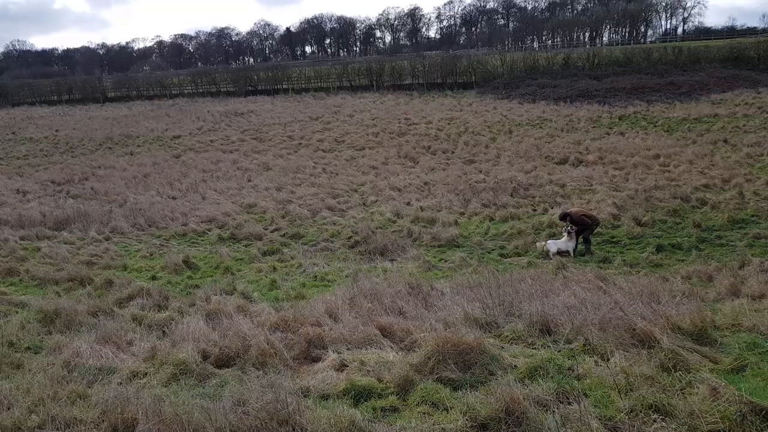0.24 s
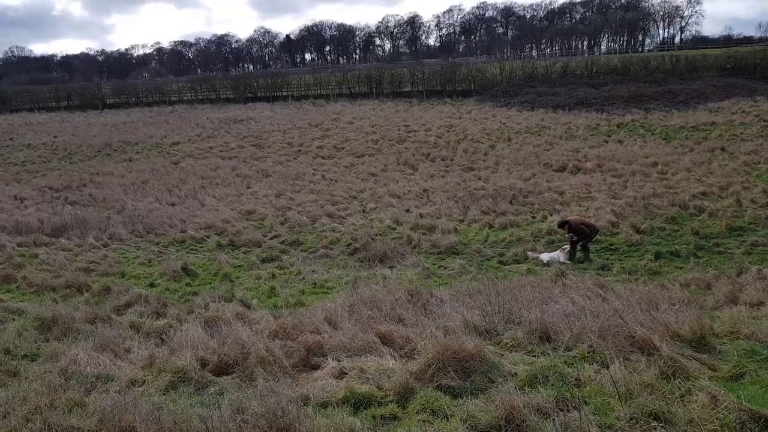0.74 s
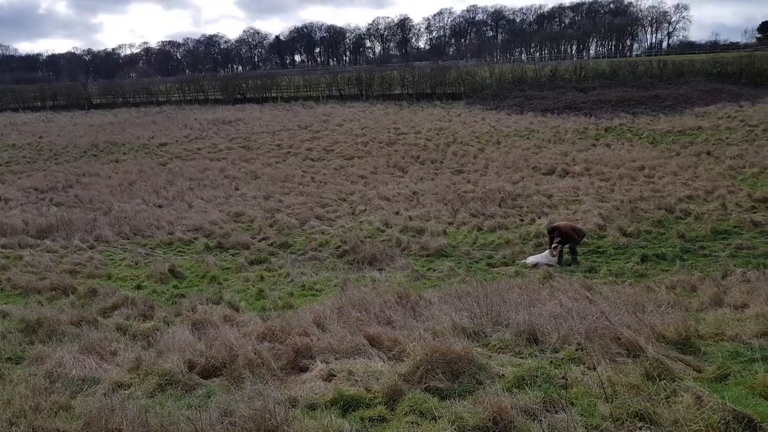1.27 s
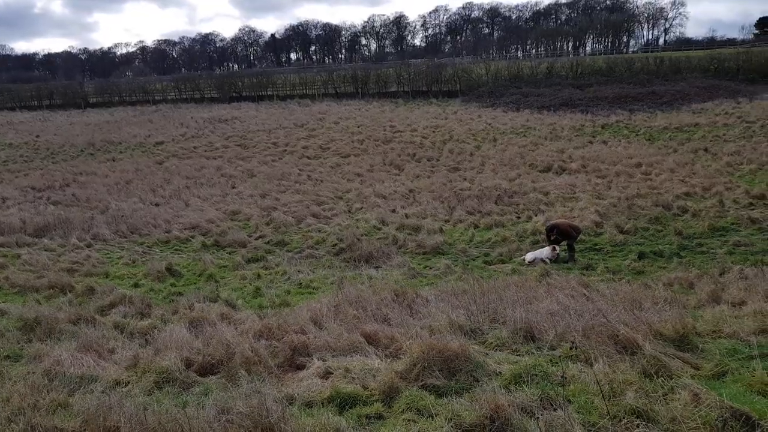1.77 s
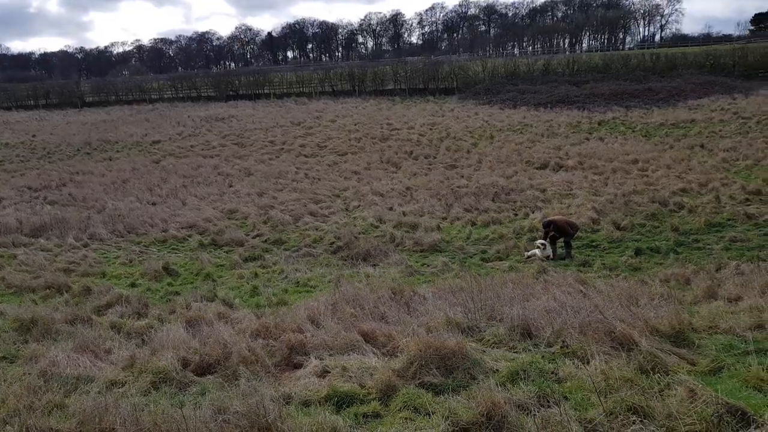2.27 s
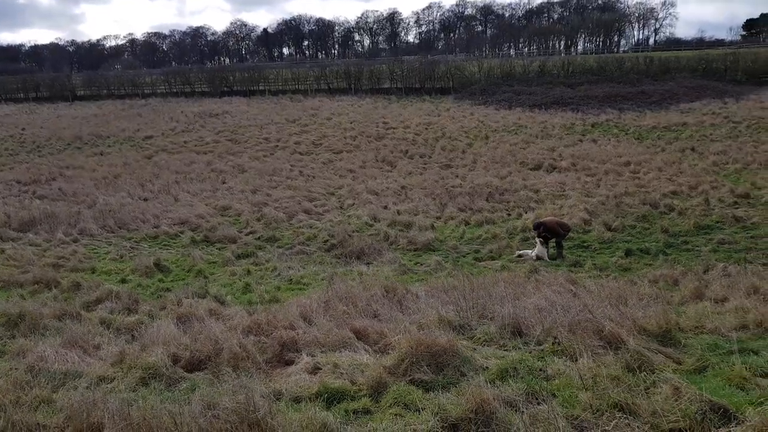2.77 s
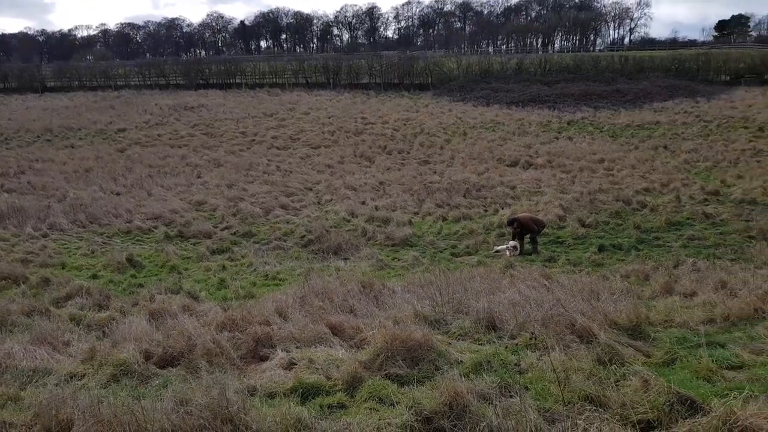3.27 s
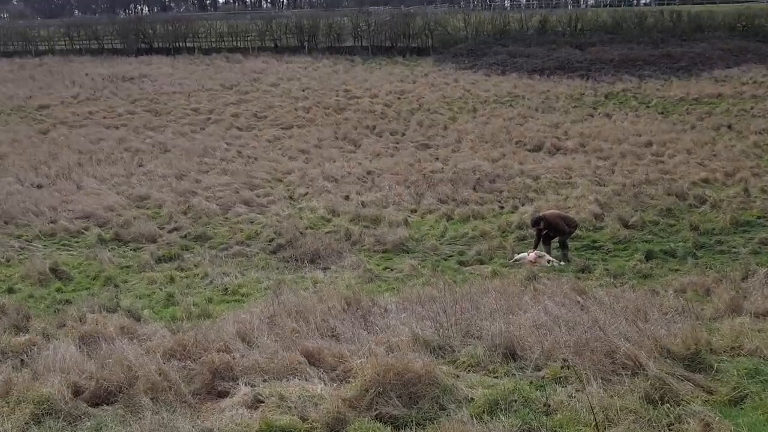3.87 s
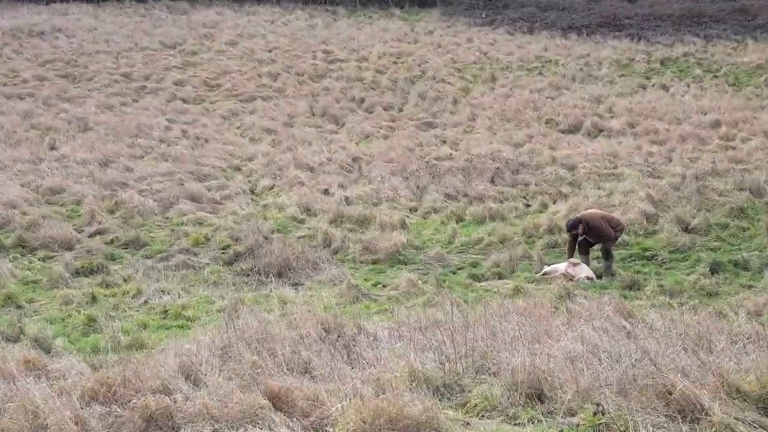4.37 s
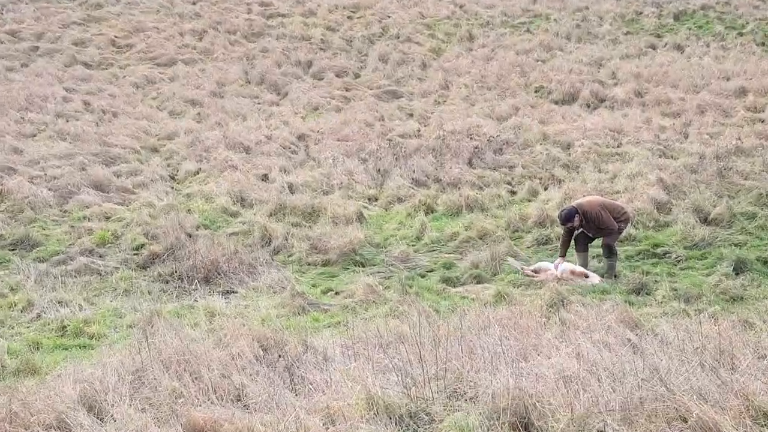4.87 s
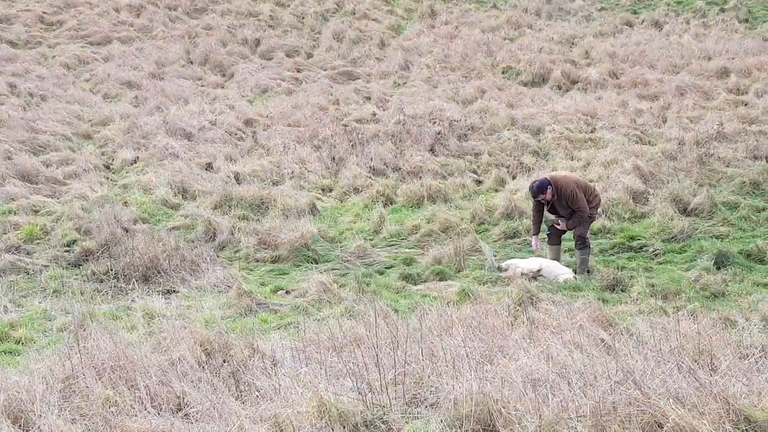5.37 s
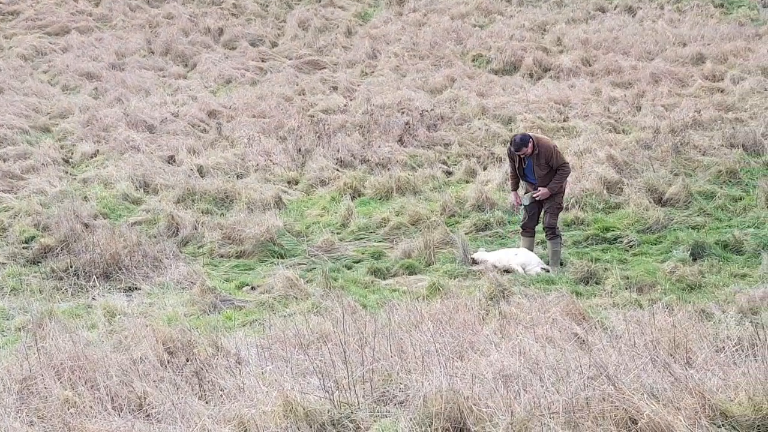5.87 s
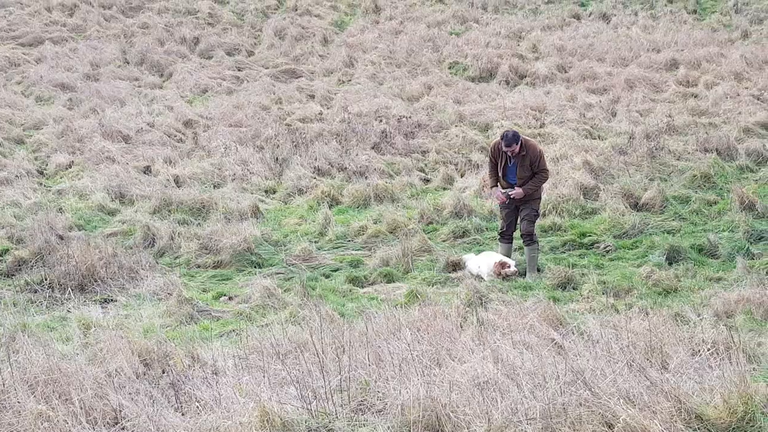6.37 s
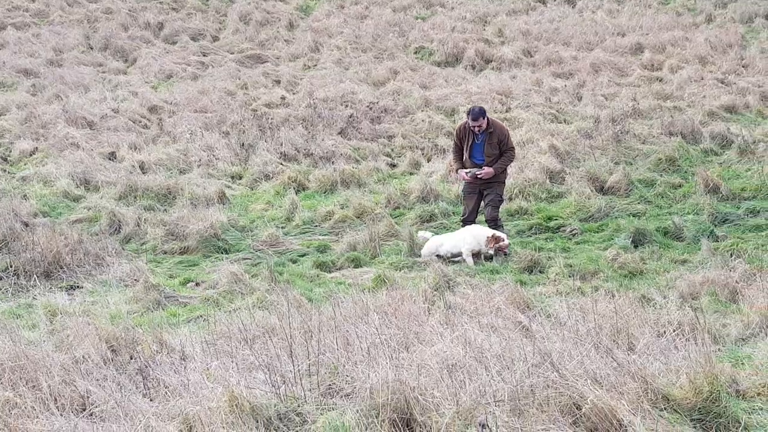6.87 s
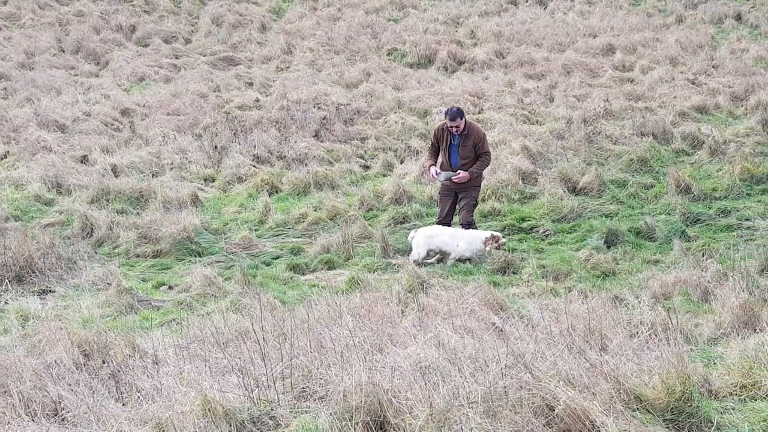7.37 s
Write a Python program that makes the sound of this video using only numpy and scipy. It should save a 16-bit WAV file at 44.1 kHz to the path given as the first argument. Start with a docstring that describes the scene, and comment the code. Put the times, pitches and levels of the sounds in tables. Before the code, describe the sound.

Close, rough wind rumble dominates a quiet grassland. It starts with a gust and a dense ragged burst, continues with frequent short bassy thumps on the right and low flutters on the left, then calms after about five seconds. Dry grass rustles faintly, a barely audible hoarse bird chirps once midway, soft brushing strokes pass, and a late strong buffet interrupts the lull.

```python
"""Wind buffets the two microphone ports of a hand-held camera in a field of long grass.
Unrelated turbulence, as filtered noise, thumps in short deep buffets at the right port and flutters
through the hollow of the left one. Far trees, near and dry grass and a high hiss are coloured noise;
the camera's noise suppression leaves a narrow shifting band. Something soft, like a sleeve, brushes
the left port in strokes of noise. A distant bird chirps once: a hoarse, gliding tone."""
import sys
import numpy as np
from scipy import signal
from scipy.fft import rfft, irfft, next_fast_len
from scipy.io import wavfile
from scipy.ndimage import uniform_filter1d, map_coordinates

SR = 44100
rng = np.random.default_rng(int(sys.argv[2]) if len(sys.argv) > 2 else 0)


def wrap_up_sound(samples):
    """Save the sound to the file named by the first command line argument, as 16-bit audio."""
    columns = np.atleast_2d(samples).T
    # keep every value between -1 and 1, then stretch to whole-number steps
    tamed = np.clip(columns, -1, 1)
    steps = np.round(tamed * 32767).astype(np.int16)
    wavfile.write(sys.argv[1], SR, steps)


N = 336483
TIME = np.arange(N) / SR
BAND_HZ = 22 * 2 ** np.arange(0, 8, 1 / 3)
TOP_HZ = 15750

# Relative levels and spectra: source gains and rms scaling follow.
# changing airflow beneath the gusts and buffets: time_s, left_relative_db, right_relative_db
AIRFLOW = [(0.1, -36.5, -30.5), (0.45, -26.5, -24), (1.2, -36, -27), (1.7, -31, -25.5), (2.75, -31, -30.5),
           (3.3, -28.5, -27), (3.8, -34, -27), (4.3, -30, -24.5), (5.0, -27.5, -26), (5.2, -29.5, -38),
           (5.8, -37, -36.5), (6.5, -47.5, -37.5), (7.0, -47, -33), (7.6, -36.5, -35.5)]
# gusts at the left port: crest_s, lift_db, half_width_s (to 1/e), cutoff_lift_octaves
GUSTS = [(0.01, 11.5, 0.077, 0.42), (0.256, 5.5, 0.16, 1.1), (0.596, 4, 0.062, 0.53),
         (0.997, 7, 0.029, 1.8), (1.1, 7, 0.055, 1.7), (1.402, 4, 0.073, 1.1), (1.886, 0.5, 0.039, 1.2),
         (2.15, 6.5, 0.078, 0.9), (2.587, 5, 0.06, -0.39), (2.795, 3.5, 0.053, 1.1),
         (4.845, 6.5, 0.047, -0.16), (4.939, 4, 0.039, 0.94), (5.526, 6, 0.031, 0.26),
         (6.05, 7, 0.14, 0.35), (6.809, 7, 0.083, -0.14), (7.127, 11, 0.073, -0.83), (7.317, 6, 0.035, 1.4)]
# brief lulls on both ports: lowest_s, change_db, half_width_s (to 1/e)
LULLS = [(0.732, -6, 0.0054), (2.212, -11, 0.019)]
# sharp flutters at the left port: onset_s, relative_db, eddy_cutoff_hz
FLUTTERS = [(0.406, -31, 800), (0.978, -33.5, 845), (1.078, -35, 1750), (1.119, -34.5, 1200),
            (1.315, -33, 800), (2.028, -33.5, 1050), (2.066, -32.5, 950), (2.133, -25.5, 884),
            (2.157, -30, 1050), (2.181, -32.5, 1040), (2.245, -35.5, 900), (2.819, -38, 900),
            (2.863, -33.5, 900), (3.099, -35, 630), (4.371, -36.5, 900), (4.45, -30.5, 920),
            (4.934, -31, 765)]
# buffets on the right port: crest_s, relative_db, half_width_s (to 1/e^2), eddy_cutoff_hz
BUFFETS = [(0.453, -14.5, 0.051, 800), (0.485, -10.5, 0.041, 1450), (0.513, -10.5, 0.025, 1200),
           (0.543, -17.5, 0.064, 780), (0.612, -21, 0.025, 602), (0.666, -16.5, 0.023, 380),
           (0.802, -13, 0.017, 270), (0.85, -18.5, 0.045, 340), (1.005, -22.5, 0.1, 487),
           (1.336, -27.5, 0.027, 646), (1.384, -22.5, 0.0088, 260), (1.585, -13.5, 0.012, 390),
           (1.694, -10, 0.015, 297), (1.772, -20, 0.035, 320), (1.88, -20.5, 0.02, 260),
           (1.971, -14, 0.02, 497), (2.07, -23.5, 0.018, 350), (2.136, -12, 0.022, 517),
           (2.281, -16, 0.027, 278), (2.428, -17.5, 0.023, 302), (2.495, -19.5, 0.028, 310),
           (2.77, -25, 0.02, 400), (2.927, -20, 0.034, 720), (2.972, -15.5, 0.035, 275),
           (3.035, -18, 0.029, 200), (3.103, -16, 0.024, 322), (3.194, -19.5, 0.067, 395),
           (3.247, -16.5, 0.021, 310), (3.305, -17, 0.038, 334), (3.417, -15, 0.018, 218),
           (3.503, -14.5, 0.028, 209), (3.69, -19, 0.042, 282), (3.742, -18, 0.047, 242),
           (3.861, -18, 0.019, 220), (4.001, -19, 0.021, 290), (4.096, -20.5, 0.0097, 600),
           (4.162, -14.5, 0.034, 330), (4.257, -18, 0.022, 180), (4.336, -20.5, 0.016, 150),
           (4.426, -9.5, 0.016, 265), (4.652, -17, 0.02, 285), (4.692, -17.5, 0.019, 280),
           (4.747, -22.5, 0.013, 197), (4.855, -16, 0.01, 300), (4.976, -15, 0.029, 312),
           (5.037, -15.5, 0.04, 240), (5.597, -23.5, 0.043, 213), (5.84, -24, 0.019, 110),
           (5.902, -18.5, 0.036, 85), (6.275, -23, 0.012, 258), (6.328, -28, 0.064, 174),
           (6.552, -27, 0.032, 137), (6.783, -26, 0.03, 376), (6.833, -18.5, 0.033, 550),
           (6.916, -21, 0.0093, 340), (7.109, -13.5, 0.014, 448), (7.135, -8.5, 0.021, 340),
           (7.161, -17, 0.023, 910), (7.182, -17.5, 0.03, 850), (7.215, -25, 0.04, 110),
           (7.453, -23.5, 0.017, 91.5)]
# far-tree spectrum at the left port: frequency_hz, relative_db
TREES_LEFT_SPECTRUM = [(200, -9), (480, -0.5), (650, -8), (900, -1.5), (1030, -0.5), (1210, -7), (1370, -2),
                       (1880, -16), (2300, -16.5), (2600, -16), (2850, -20), (5000, -45.5)]
# far-tree spectrum at the right port: frequency_hz, relative_db
TREES_RIGHT_SPECTRUM = [(200, -3.5), (450, 4.5), (650, -5), (1000, -2.5), (1800, -8.5), (2300, -19),
                        (2800, -38.5), (5000, -58)]
# breeze in the far trees: time_s, relative_db
TREES_LEVEL = [(0, -50.5), (2.9, -51), (3.7, -47), (4.2, -49), (5.6, -47), (7.6, -49.5)]
# narrow noise band left by the camera's noise suppression, its centre shifting:
# time_s, centre_hz, level_db (against the trees)
SUPPRESSOR_BAND = [(2.9, 1950, -14), (3.2, 1558, -13.5), (3.7, 1624, -9), (4.6, 1570, -11.5),
                   (5.75, 1620, -11.5), (6.0, 1940, -10)]
# near-grass spectrum: frequency_hz, relative_db
GRASS_SPECTRUM = [(1500, -10.5), (2500, 3), (3100, -3.5), (3950, -0.5), (4300, -8), (6800, -11),
                  (7800, -25), (14000, -33)]
# breeze in the near grass: time_s, relative_db
GRASS_LEVEL = [(0.05, -66), (0.45, -62.5), (0.9, -68), (1.55, -60.5), (1.85, -73), (2.3, -61.5),
               (3.22, -70), (3.4, -63), (3.85, -65.5), (4.2, -70), (4.9, -64), (5.8, -66.5), (7.05, -61.5),
               (7.6, -64)]
# high-hiss spectrum: frequency_hz, relative_db
HISS_SPECTRUM = [(3000, -11), (9300, -16.5), (10500, -1), (12000, 3.5)]
# brushing strokes: crest_s, relative_db, rise_s, fall_s (both to 1/e)
STROKES = [(2.22, -62.5, 0.083, 0.027), (2.66, -56, 0.21, 0.2), (3.0, -65.5, 0.15, 0.14),
           (6.06, -58.5, 0.13, 0.11), (6.26, -56.5, 0.12, 0.06), (6.36, -54.5, 0.095, 0.046),
           (6.57, -62.5, 0.15, 0.13)]
# brushing spectrum: frequency_hz, relative_db
BRUSH_SPECTRUM = [(1200, 4.5), (2500, 5.5), (3800, 2), (5000, -1), (7000, 1), (8200, -5), (12000, -0.5),
                  (14000, -3.5)]
# rustles of dry grass: crest_s, level_db, half_width_s (to 1/e), centre_hz
RUSTLES = [(3.713, -65.5, 0.39, 3050), (4.55, -70.5, 0.23, 3520), (5.13, -68.5, 0.4, 3380),
           (7.0, -63, 0.09, 2800)]
# bird chirp: time_s, pitch_hz
CHIRP = [(3.985, 2630), (4.01, 2830), (4.03, 2580), (4.065, 3000)]

# faster air makes smaller eddies: cut-off at a reference airflow level, and its rise with level
REFERENCE_DB = -33
LEFT_EDDY_HZ, LEFT_OCTAVES_PER_DB = 413, 0.16
RIGHT_EDDY_HZ, RIGHT_OCTAVES_PER_DB = 118, 0.0445
HISS_START_DB, HISS_END_DB, HISS_GROWTH_S = -81, -75, 5.2
STROKE_SHAPE = 1.5  # 1 = pointed crest, 2 = rounded


def undb(db):
    """Decibels to gain."""
    return 10 ** (np.asarray(db) / 20)


def unit(x):
    """Scale to rms 1."""
    return x / np.sqrt(np.mean(x ** 2))


def steady(x, samples):
    """Hold the rms near 1 over stretches of samples, keeping the finer grain."""
    power = uniform_filter1d(uniform_filter1d(x ** 2, samples), samples)
    return x / np.sqrt(power + 1e-18)


def curves(table):
    """Interpolate every column after time_s at every sample."""
    time_s, *columns = np.transpose(table)
    return [np.interp(TIME, time_s, column) for column in columns]


def freqs(count):
    """Spectrum frequencies of count samples in Hz, kept above zero."""
    return np.maximum(np.arange(count // 2 + 1) * SR / count, 1)


def walk(rate_hz, count=N):
    """Smooth random curve of spread about 1 through rate_hz random points a second."""
    steps = np.arange(count) / SR * rate_hz + rng.random()
    points = rng.standard_normal(int(steps[-1]) + 3)
    return map_coordinates(points, [steps], order=2, mode="mirror")


def coloured(spectrum, lag_s=0, noise=None):
    """Noise of rms 1 shaped by a spectrum table, falling away below its first frequency."""
    hz, db = np.transpose(spectrum)
    count = next_fast_len(N)
    f = freqs(count)
    gain = undb(np.interp(np.log(f), np.log(hz), db)) * np.minimum(f / hz[0], 1) ** 2
    noise = rng.standard_normal(N) if noise is None else noise
    delay = np.exp(-2j * np.pi * f * lag_s)
    return unit(irfft(rfft(noise, count) * gain * delay, count)[:N])


def butter(x, hz, kind, order):
    """Butterworth low-pass or high-pass."""
    return signal.sosfilt(signal.butter(order, hz, kind, fs=SR, output="sos"), x)


def resonance(f, hz, width_hz):
    """Response of one resonance, 1 at its centre."""
    return 1 / (1 + 1j * (f * f - hz * hz) / (f * width_hz))


def rumble(f, peak_hz=76, width_hz=92, low_cut_hz=40):
    """Eddy pressure falls with frequency; the microphone sheds the deepest bass."""
    return np.abs(resonance(f, peak_hz, width_hz)) / np.sqrt(1 + (low_cut_hz / f) ** 10)


def hollow_port(f, hollow_db=1.0):
    """Rumble plus the broad resonance of the left port's hollow."""
    hollow = np.abs(resonance(f, hz=345.0, width_hz=326)) ** 2
    return np.hypot(rumble(f), undb(hollow_db) * hollow)


def fade(f, cutoff_hz, steepness=1.74):
    """Eddies smaller than a limit die out; a higher cut-off admits smaller ones."""
    return np.exp(-(f / cutoff_hz) ** steepness)


def turbulence(port, level_db, cutoff_hz, flutter_db, flutter_rate_hz, sway, steady_samples,
               spike=0.28, spike_rate_hz=210):
    """Eddy stream: surges are louder and brighter, and tiny eddies fray its upper edge."""
    count = next_fast_len(N)
    f = freqs(count)
    noise = rfft(rng.standard_normal(count)) * port(f)
    surge = walk(flutter_rate_hz)
    cutoff_hz = cutoff_hz * np.exp(sway * surge + spike * walk(spike_rate_hz))
    stream = 0
    for hz in BAND_HZ:
        # overlapping third-octave bands, each faded by the moving cut-off
        share = np.maximum(1 - np.abs(3 * np.log2(f / hz)), 0)
        stream = stream + irfft(noise * share, count)[:N] * fade(hz, cutoff_hz)
    return steady(stream * undb(flutter_db * surge), steady_samples) * undb(level_db)


def wind():
    """Unrelated turbulence on the two ports."""
    return np.array([left_port(), right_port()])


def left_port(gain_db=-1):
    """Open port flutters through its hollow; each gust makes the stream louder and shifts its cut-off."""
    level_db, _ = curves(AIRFLOW)
    octaves = LEFT_OCTAVES_PER_DB * (level_db - REFERENCE_DB)
    for crest_s, lift_db, half_width_s, lift_octaves in GUSTS:
        swell = np.exp(-((TIME - crest_s) / half_width_s) ** 2)
        level_db = level_db + lift_db * swell
        octaves = octaves + lift_octaves * swell
    stream = turbulence(hollow_port, level_db + gain_db + lulls(), LEFT_EDDY_HZ * 2 ** octaves,
                        flutter_db=2.0, flutter_rate_hz=55, sway=0.19, steady_samples=3000)
    return stream + flutters()


def right_port(gain_db=1):
    """Muffled port rumbles with the airflow and thumps under each buffet."""
    _, level_db = curves(AIRFLOW)
    cutoff_hz = RIGHT_EDDY_HZ * 2 ** (RIGHT_OCTAVES_PER_DB * (level_db - REFERENCE_DB))
    stream = turbulence(rumble, level_db + gain_db + lulls(), cutoff_hz,
                        flutter_db=2.5, flutter_rate_hz=45, sway=0.42, steady_samples=1600)
    return butter(stream + buffets(), 2600, "low", order=5)


def far_trees(right_db=-5.0, flicker_db=0.82, apart=.55):
    """Far trees roar softly, reaching the right port first; a suppressor band rides on the left."""
    trees_db, = curves(TREES_LEVEL)
    shared = rng.standard_normal(N)
    at_left, at_right = shared + apart * rng.standard_normal((2, N))
    gust = undb(trees_db + flicker_db * walk(12))
    left = coloured(TREES_LEFT_SPECTRUM, lag_s=0.00012, noise=at_left)
    right = undb(right_db) * coloured(TREES_RIGHT_SPECTRUM, noise=at_right)
    # the right port follows the gusts half as far in dB
    return np.array([gust * (left + suppressor_band()), np.sqrt(gust * np.mean(gust)) * right])


def suppressor_band(width_hz=380):
    """Noise suppression leaves a narrow band: random walks on both quadratures of a moving centre."""
    centre_hz, level_db = curves(SUPPRESSOR_BAND)
    phase = 2 * np.pi * np.cumsum(centre_hz) / SR
    return undb(level_db) * (walk(width_hz) * np.cos(phase) + walk(width_hz) * np.sin(phase))


def near_grass(gain_db=-1, flicker_db=1.4, right_db=-21):
    """Near grass whispers as flickering noise, mostly on the open left port."""
    grass_db, = curves(GRASS_LEVEL)
    grass = np.array([coloured(GRASS_SPECTRUM), undb(right_db) * coloured(GRASS_SPECTRUM)])
    return grass * undb(grass_db + gain_db + flicker_db * walk(22))


def hiss(right_db=-1):
    """Faint high hiss, unrelated on the two sides, grows steadily in dB, then holds."""
    level_db = np.interp(TIME, [0, HISS_GROWTH_S], [HISS_START_DB, HISS_END_DB])
    noise = np.array([coloured(HISS_SPECTRUM), undb(right_db) * coloured(HISS_SPECTRUM)])
    return undb(level_db) * noise


def buffets(gain_db=0, ragged_db=6.0, ragged_rate_hz=240, flap_db=1.4, flap_rate_hz=70,
            bright_db=2.5, count=16384):
    """Each buffet is a large eddy sweeping over the port, breaking into small ragged ones at its crest."""
    out, f = np.zeros(N + 2 * count), freqs(count)
    t = (np.arange(count) - count // 2) / SR
    deep = fade(f, 230, steepness=2.8)
    for crest_s, db, half_width_s, cutoff_hz in BUFFETS:
        swell = np.exp(-2 * (t / half_width_s) ** 2)
        shape = rumble(f, peak_hz=96, width_hz=114.5, low_cut_hz=45.6) * fade(f, cutoff_hz)
        noise = rfft(rng.standard_normal(count)) * shape
        thump = unit(swell * steady(irfft(noise * deep), 1100))
        ragged = undb(ragged_db * walk(ragged_rate_hz, count) + flap_db * walk(flap_rate_hz, count))
        rattle = unit(swell ** 1.8 * steady(irfft(noise * (1 - deep)) * ragged, 1500))
        # a higher cut-off puts more of the eddy into its rattle
        rattle_share = np.linalg.norm(shape * (1 - deep)) / np.linalg.norm(shape * deep)
        buffet = unit(thump + undb(bright_db) * rattle_share * rattle)
        start = int(crest_s * SR) + count // 2
        out[start:start + count] += buffet * np.sqrt(np.mean(swell ** 2)) * undb(db + gain_db)
    return out[count:count + N]


def flutters(gain_db=8, rise_s=0.0039, width_share=0.48, count=4096):
    """Sudden small eddies briefly ring the left port's hollow; sharper ones ring it more broadly."""
    out, f = np.zeros(N + count), freqs(count)
    age = np.arange(count) / SR / rise_s
    swell = age * np.exp(1 - age)
    for onset_s, db, cutoff_hz in FLUTTERS:
        hollow = np.abs(resonance(f, hz=366, width_hz=width_share * cutoff_hz)) ** 2
        noise = rfft(rng.standard_normal(count))
        puff = unit(swell * irfft(noise * hollow * fade(f, cutoff_hz)))
        start = int(onset_s * SR)
        out[start:start + count] += puff * np.sqrt(np.mean(swell ** 2)) * undb(db + gain_db)
    return out[:N]


def lulls():
    """Level change in dB as the air briefly drops."""
    return sum(db * np.exp(-((TIME - lowest_s) / half_width_s) ** 2)
               for lowest_s, db, half_width_s in LULLS)


def brushing(gain_db=2, grain_db=0.9, grain_rate_hz=500, drag_db=1.2, drag_rate_hz=35, right_db=-26):
    """Cloth slides unevenly by the left port: fine-grained hiss swells and dies with each stroke."""
    stroke = 0
    for crest_s, db, rise_s, fall_s in STROKES:
        side_s = np.where(TIME < crest_s, rise_s, fall_s)
        stroke = stroke + undb(db) * np.exp(-(np.abs(TIME - crest_s) / side_s) ** STROKE_SHAPE)
    rub = stroke * undb(gain_db + grain_db * walk(grain_rate_hz) + drag_db * walk(drag_rate_hz))
    return rub * np.array([coloured(BRUSH_SPECTRUM), undb(right_db) * coloured(BRUSH_SPECTRUM)])


def dry_grass(width_hz=1300, right_db=-27, shape=6):
    """Patches of grass rustle, hold and stop as resonant noise, mostly at the open left port."""
    count = next_fast_len(N)
    f = freqs(count)
    rustle = 0
    for crest_s, db, half_width_s, hz in RUSTLES:
        noise = rfft(rng.standard_normal((2, count)))
        band = unit(irfft(noise * resonance(f, hz, width_hz) ** 3, count)[:, :N])
        swell = np.exp(-np.abs((TIME - crest_s) / half_width_s) ** shape)
        rustle = rustle + undb(db) * swell * band
    return rustle * undb([[0], [right_db]])


def far_bird(level_db=-60.0, blur=1.4, blur_rate_hz=480, right_db=-14):
    """Faint gliding chirp, hoarse: random modulation blurs it into a band around its pitch."""
    pitch_hz, = curves(CHIRP)
    start_s, end_s = CHIRP[0][0], CHIRP[-1][0]
    progress = np.clip((TIME - start_s) / (end_s - start_s), 0, 1)
    phase = 2 * np.pi * np.cumsum(pitch_hz) / SR
    in_phase = (1 + blur * walk(blur_rate_hz)) * np.cos(phase)
    tone = unit(in_phase + blur * walk(blur_rate_hz) * np.sin(phase))
    swell = np.sqrt(np.abs(np.sin(np.pi * progress)))
    return tone * swell * undb(level_db) * undb([[0], [right_db]])


def scene():
    """Wind on the ports over the sound of the field."""
    return wind() + far_trees() + near_grass() + hiss() + brushing() + dry_grass() + far_bird()


def record(dry, ceiling=0.79, fade_in_s=.004):
    """Microphones round the hardest thumps; the camera cuts the deepest bass and the top."""
    rounded = ceiling * np.tanh(dry / ceiling)
    # a very short fade-in softens the abrupt start
    sound = butter(rounded, 26, "high", order=3) * np.minimum(TIME / fade_in_s, 1)
    top_cut = signal.ellip(14, .1, 100, TOP_HZ, fs=SR, output="sos")
    return signal.sosfilt(top_cut, sound, axis=-1)


dry = scene()
out = record(dry)
wrap_up_sound(out)
```